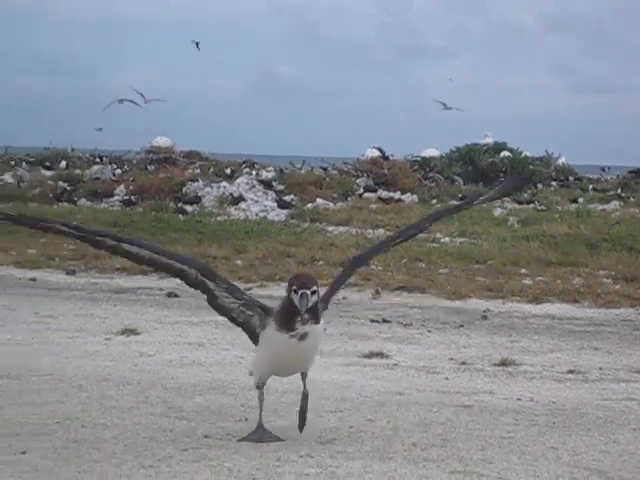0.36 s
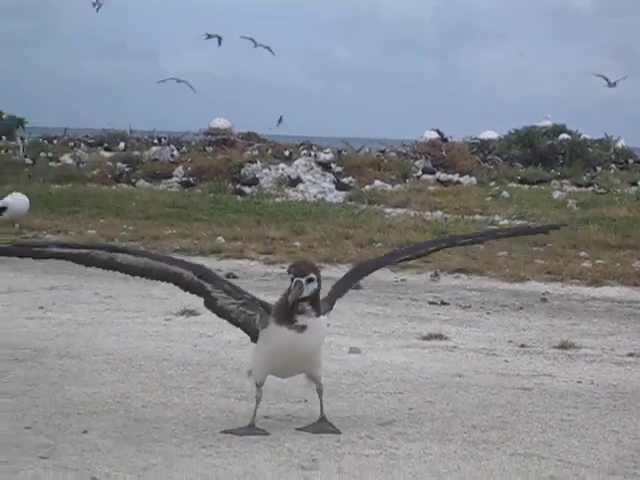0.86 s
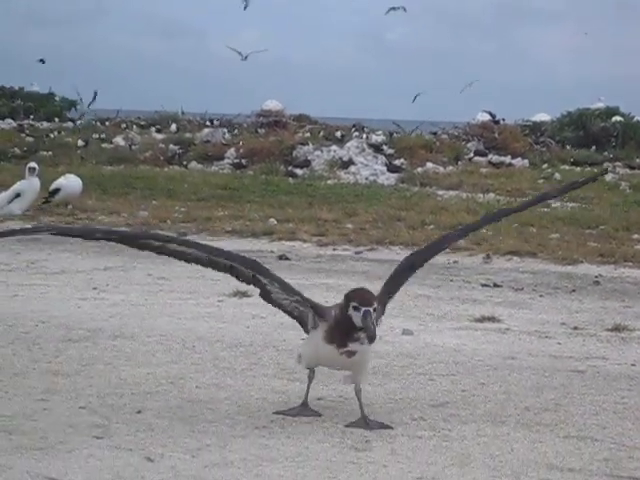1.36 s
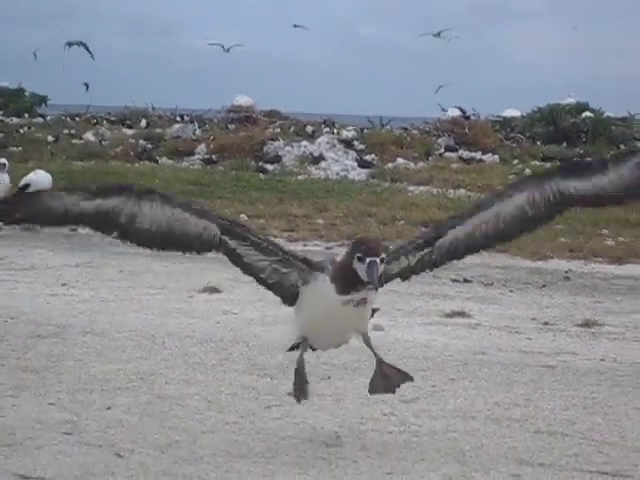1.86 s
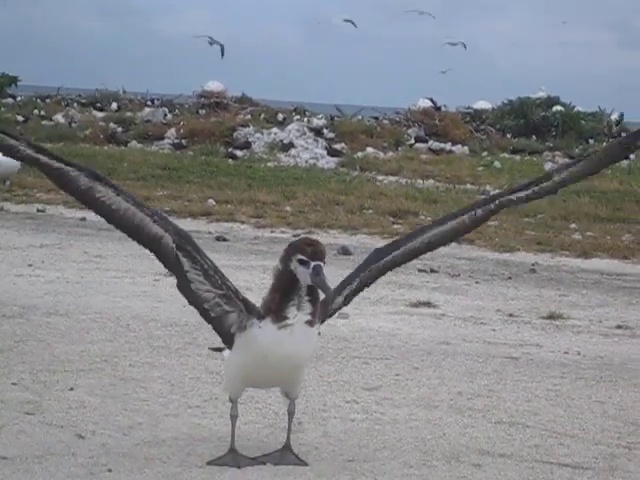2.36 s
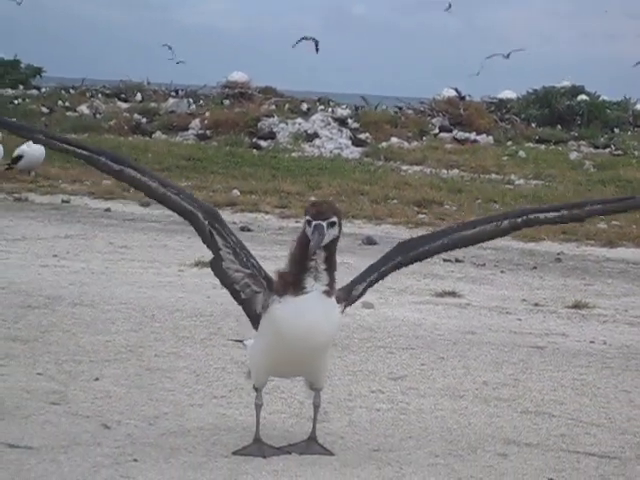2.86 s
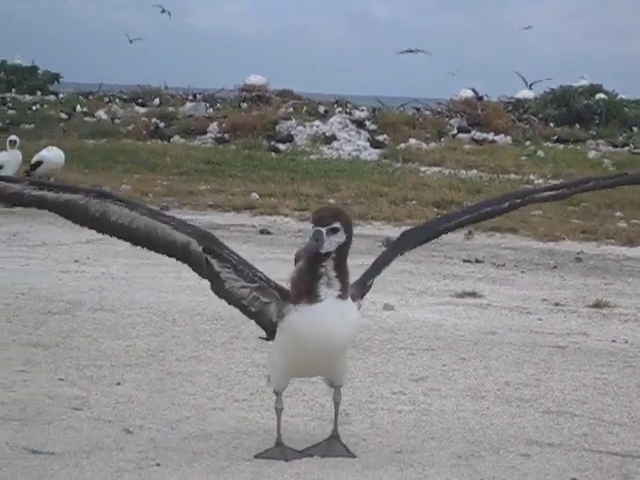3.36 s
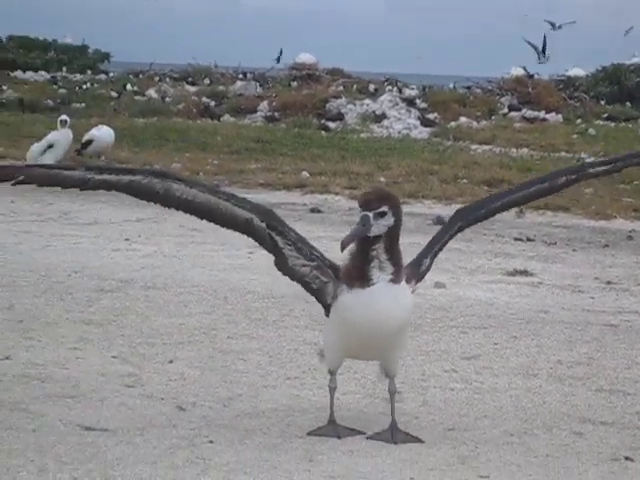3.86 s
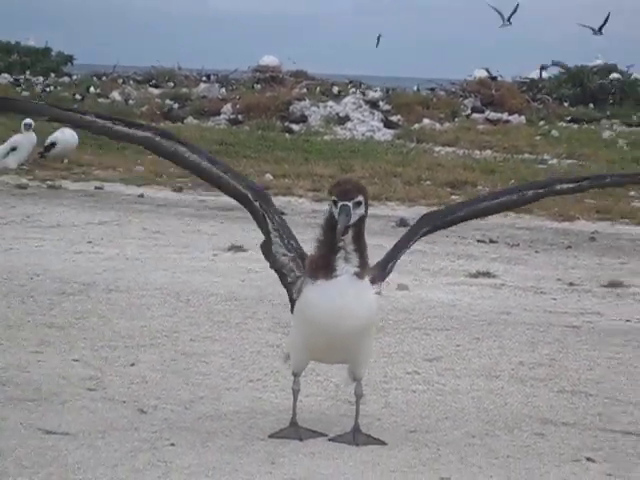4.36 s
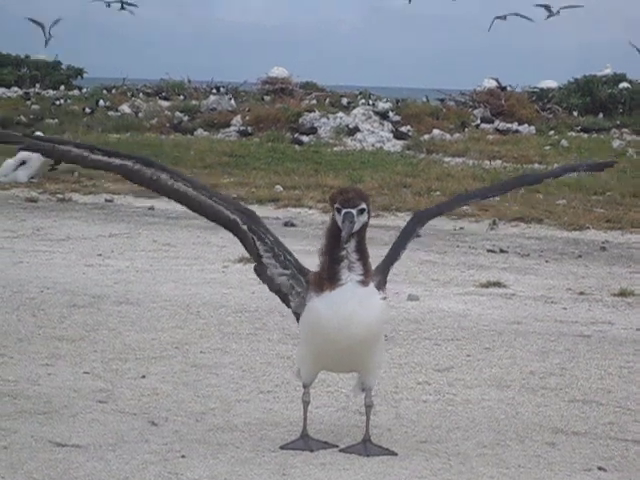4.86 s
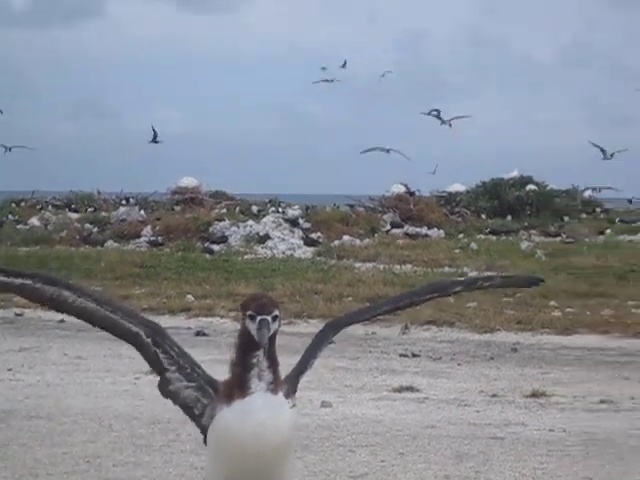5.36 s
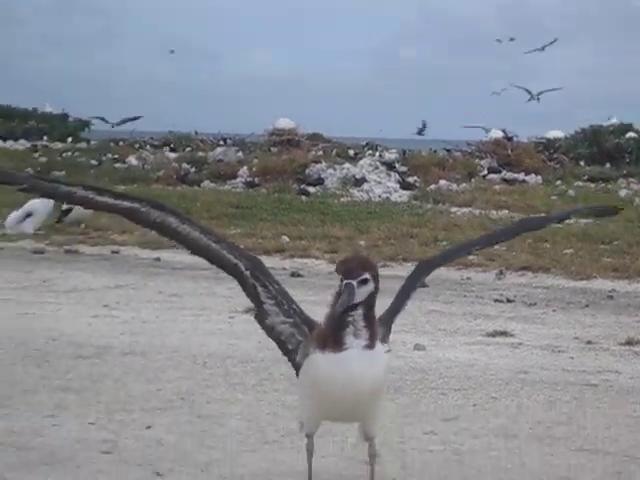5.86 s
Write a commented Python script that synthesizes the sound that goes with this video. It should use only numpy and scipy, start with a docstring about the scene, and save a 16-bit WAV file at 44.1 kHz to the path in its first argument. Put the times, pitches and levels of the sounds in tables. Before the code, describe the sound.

Terns give harsh, nasal, buzzy cries near the microphone over dense seabird colony chatter, while gusty wind thumps and flutters against it.

```python
"""An open seabird colony in gusty wind, heard by one microphone.
Terns fly past with clean, buzzy, gliding calls: pulse trains and breath through a throat and bill filter.
Behind them is the dense chatter of the far colony and of birds overhead: crowds of gliding pulse trains.
The wind is filtered noise, a rumble and a lumpy flutter on the microphone port, bursting into short puffs.
A faint steady hiss of sea and open ground lies beneath."""
import sys
import numpy as np
from scipy import signal
from scipy.fft import rfft, irfft, next_fast_len
from scipy.io import wavfile
from scipy.ndimage import uniform_filter1d, map_coordinates

SR = 44100
rng = np.random.default_rng(int(sys.argv[2]) if len(sys.argv) > 2 else 0)


def dump_mix(stems):
    """Bounce the given channels to the path in sys.argv[1] as a 16-bit WAV at rate SR."""
    frames = np.atleast_2d(stems).T  # one column per channel
    limited = np.clip(frames, -1, 1)  # hard clip at full scale
    pcm = np.round(limited * 32767).astype(np.int16)
    wavfile.write(sys.argv[1], SR, pcm)


def ratio_of_db(decibels):
    """Turn decibels (scalar or array-like) into linear amplitude factors; 0 dB maps to 1."""
    return 10 ** (np.asarray(decibels, float) / 20)


N = 275184  # samples

# Colony levels. Each row: time in seconds, far chatter in dB, birds overhead in dB.
COLONY_LEVELS = [(0.0, -35.5, -41), (0.24, -35, -49), (0.56, -40.5, -54.5), (0.84, -34, -43.5),
                 (1.54, -35, -47), (1.8, -31, -38.5), (2.54, -38.5, -50), (2.88, -32, -47),
                 (3.02, -30, -39), (3.34, -34, -43), (3.56, -34, -45), (3.88, -36.5, -47.5),
                 (4.74, -27, -36.5), (5.08, -30.5, -40.5), (5.24, -32.5, -73), (5.38, -31.5, -46),
                 (5.88, -28.5, -38), (6.22, -36.5, -47)]
# Far chatter spectrum. Each row: frequency in Hz, relative gain in dB.
FAR_SPECTRUM = [(900, -21.5), (1400, -17), (1950, -2), (2750, 1.5), (3500, -9.5), (5000, -40.5),
                (6000, -23), (9000, -35.5), (15800, -50)]
# Overhead birds spectrum. Each row: frequency in Hz, relative gain in dB.
OVERHEAD_SPECTRUM = [(2600, -36), (3600, -4), (4700, 2.5), (5400, -4), (6100, -20), (8000, -48),
                     (11000, -36), (15800, -28)]
# Wind levels. Each row: time in seconds, rumble in dB, flutter over rumble in dB.
WIND_LEVELS = [(0.0, -40, -2), (0.07, -25, 1.5), (0.24, -41.5, -3.5), (0.29, -27, 1.5), (0.52, -29.5, 1),
               (0.54, -37.5, -1), (0.64, -28, -33), (0.76, -38, 1.5), (0.9, -34.5, 0.5), (2.15, -23, -4.5),
               (2.59, -28.5, -4.5), (2.64, -19, -11), (2.76, -33, -9), (3.53, -22.5, -0.5),
               (3.82, -39, -2.5), (4.69, -34.5, -4), (4.97, -31, 3), (6.24, -28, -4)]
# Rumble spectrum. Each row: frequency in Hz, relative gain in dB.
RUMBLE_SPECTRUM = [(15, 4.5), (30, -6), (70, -0.5), (130, -5.5), (250, -26), (600, -75)]
# Flutter spectrum. Each row: frequency in Hz, relative gain in dB.
FLUTTER_SPECTRUM = [(70, -56), (140, 4), (250, -0.5), (450, -13.5), (900, -24.5), (1600, -102)]
# Tern throat resonance. Each row: frequency in Hz, gain in dB.
THROAT_GAIN = [(700, -9), (1500, -26), (2400, 19.5), (3300, 8), (4200, 7), (5200, 7.5), (6800, -1.5),
               (9000, -14), (12000, -20.5), (16000, -37)]
# Full call up to a catch of the voice. Each row: time from the catch in seconds before slowing,
# pitch in Hz before scaling to the top pitch, level in dB relative to the call.
CALL_BEFORE_CATCH = [(-.175, 740, -40), (-.15, 726, 1), (-.13, 840, -8.5), (-.115, 925, 0.5),
                     (-.098, 810, 0.5), (-.062, 760, 2.5), (-.043, 855, -0.5), (-.028, 966, 4),
                     (-.008, 1130, -0.5), (0, 1220, 2)]
# Full call after the catch. Each row: time, pitch and level, as in CALL_BEFORE_CATCH.
CALL_AFTER_CATCH = [(.015, 1010, -12), (0.023, 1050, 6), (0.035, 890, 0.5), (0.05, 960, 1),
                    (0.07, 880, -7.5), (0.079, 848, -1)]
# Full calls. Each row: catch in seconds, slowness as a factor, top pitch in Hz, level in dB,
# open-bill resonance in Hz, its lift in dB.
FULL_CALLS = [(.15, 0.83, 1155, -40.5, 3300, 3), (3.616, 1.001, 1212, -39, 3500, 2),
              (4.545, 0.81, 1145, -41, 2770, 7.5), (5.293, 0.99, 1158, -39.5, 3220, 2)]
# Single notes, each one smooth bend. Each row: start in seconds, length in seconds, first pitch in Hz,
# middle pitch in Hz, last pitch in Hz, level in dB, bill resonance in Hz, its lift in dB.
SINGLE_NOTES = [(0.2, .033, 980, 960, 850, -50, 11700, 23), (.312, 0.042, 755, 802, 790, -49, 8060, 13),
                (0.386, 0.045, 720, 860, 704, -45.5, 8800, 12),
                (0.687, 0.04, 785, 890, 783, -38, 4120, 2.5), (0.779, 0.067, 663, 710, 785, -43.5, 8500, 8),
                (0.831, 0.037, 778, 670, 603, -43, 8340, 13), (0.874, .04, 623, 682, 640, -48, 8500, 19),
                (0.912, 0.037, 736, 786, 706, -46, 9000, 27), (1.145, 0.079, 774, 797, 856, -55, 4930, 16),
                (1.2, 0.052, 800, 613, 716, -51.5, 5160, 12),
                (1.289, 0.065, 697, 750, 968, -42.5, 9000, -4),
                (1.359, 0.046, 912, 811, 777, -43, 11800, 20), (1.414, .047, 780, 795, 746, -50.5, 4200, 9),
                (2.396, 0.049, 860, 980, 820, -48.5, 3780, 9), (2.579, 0.11, 846, 914, 796, -46.5, 7600, 9),
                (2.725, 0.07, 800, 737, 744, -42, 3020, 8), (2.821, 0.076, 790, 932, 875, -53, 7050, 14),
                (2.914, 0.039, 629, 653, 720, -41.5, 4800, 10),
                (2.941, 0.073, 643, 590, 727, -37, 4800, 5.5), (3.012, 0.069, 692, 744, 816, -36, 4500, 2),
                (3.065, 0.035, 800, 844, 797, -35, 4230, 6), (3.136, 0.091, 587, 521, 677, -39.5, 4500, -1),
                (3.198, 0.045, 683, 680, 656, -39.5, 4500, -3),
                (3.714, 0.092, 548, 451, 587, -39, 7000, 5.5), (3.799, 0.031, 577, 673, 773, -32, 7000, -1),
                (3.859, 0.074, 530, 520, 497, -45.5, 7000, -1), (3.934, 0.037, 549, 578, 580, -38, 4530, 4),
                (3.965, .057, 576, 527, 587, -37.5, 4500, 4), (4.027, 0.13, 689, 701, 1013, -39, 7500, 4.5),
                (4.159, 0.057, 808, 693, 826, -39, 6900, 7), (4.217, 0.046, 793, 860, 766, -41, 6000, 2),
                (5.802, 0.038, 580, 600, 630, -47, 5000, -4), (5.969, .04, 690, 650, 663, -47, 6000, 3),
                (4.255, 0.067, 660, 685, 883, -35.5, 6500, 3), (4.308, 0.033, 885, 696, 673, -41, 6500, 6),
                (4.352, 0.073, 822, 930, 846, -48, 9700, 14), (4.438, 0.039, 676, 760, 740, -41, 11500, 21),
                (4.588, 0.032, 632, 670, 800, -34, 6000, 0), (4.537, .055, 620, 583, 638, -41, 6500, 3),
                (4.466, 0.063, 563, 520, 640, -41, 5000, 7), (4.686, .045, 604, 560, 600, -42, 5500, 5),
                (4.741, 0.053, 760, 820, 713, -33, 5500, 4), (4.856, .06, 602, 650, 585, -43, 6000, 0),
                (3.996, 0.034, 700, 822, 750, -48, 12500, 10), (4.91, 0.033, 639, 672, 620, -36, 7000, 3),
                (5.335, 0.043, 881, 940, 860, -59, 13050, 20), (4.642, 0.041, 717, 664, 650, -38, 5660, 7),
                (4.714, 0.089, 500.5, 602, 692, -34, 5440, 3.5),
                (4.814, 0.021, 627, 609, 543, -30.5, 2200, 6), (5.602, 0.07, 629, 677, 690, -36, 4800, 0),
                (5.674, 0.072, 702, 799, 886, -32.5, 4700, 4.5),
                (5.757, 0.03, 772, 647, 635, -33.5, 5500, 7), (5.843, 0.097, 639, 807, 886, -30, 3000, -1),
                (5.937, 0.027, 856, 795, 777, -33.5, 3020, 2), (6.002, .07, 661, 725, 890, -38, 4400, -1),
                (6.072, 0.058, 863, 800, 860, -46, 4400, 5.5)]
# Wind puffs. Each row: centre in seconds, level in dB, swing pitch in Hz.
PUFF_EVENTS = [(0.074, -17, 230), (0.297, -12, 300), (0.311, -11, 520), (0.363, -18.5, 302),
               (0.43, -15, 353), (0.49, -18, 286), (0.526, -20, 340), (1.192, -19, 368),
               (1.312, -11.5, 280), (1.331, -12.5, 303), (1.474, -7.5, 388), (1.49, -1.5, 445),
               (1.527, -12, 424), (1.542, -14, 596), (1.578, -17.5, 480), (1.679, -12.5, 342),
               (1.825, -11, 372), (2.091, -12, 340), (2.172, -7, 373), (2.234, -16.5, 406),
               (2.267, -10.5, 303), (2.3, -13, 332), (2.37, -4.5, 374), (2.384, -10.5, 460),
               (2.646, -10.5, 393), (2.661, -9.5, 380), (3.039, -16, 340), (3.141, -7, 460),
               (3.175, -13.5, 354), (3.223, -19, 354), (3.272, -12, 286), (3.366, -9, 320),
               (3.544, -13, 320), (3.578, -3.5, 598), (3.605, -13.5, 366), (3.716, -12.5, 416),
               (3.883, -22, 280), (4.852, -16.5, 272), (4.97, -14.5, 297), (5.056, -9, 312.7),
               (5.248, -12.5, 318), (5.54, -6, 368), (5.551, -8.5, 390), (5.567, -8, 466),
               (5.582, -14, 590), (5.694, -15.5, 477), (5.719, -12, 410), (5.893, -17, 330),
               (6.147, -13, 374)]

NOTE_ONSET_DROP_DB, NOTE_END_DROP_DB = 6, -1  # under the middle; negative is above it
DULL_DB_PER_KHZ, DULL_DB_PER_KHZ_PER_LIFT_DB = -0.7, 0.11  # treble loss, growing with bill lift
STRETCHED_LOSS_DB_PER_KHZ = 1.4  # extra loss of a stretched throat above 9 kHz
BREATH_RATIO_FULL, BREATH_RATIO_NOTE = 0.2, 0.25  # noise rms over pulse rms
THROAT_STRETCH_FULL = 1.17  # frequency factor
QUAVER_RATIO = 0.012  # pitch waver
ECHO_GAIN, ECHO_DRIFT_PER_S = 0.6, 5  # ground echo; scale of its random lag drift
NEARBY_SPREAD_S, NEARBY_DB, NEARBY_HZ = 0.04, -12.5, 340  # second puff: time spread, mean relative level, median pitch
BAND_LIMIT_HZ = 15750


def unit(x):
    """Scale to rms 1."""
    return x / np.sqrt(np.mean(x ** 2) + 1e-20)


def along(points, hz):
    """Gain in dB from (Hz, dB) points on a log frequency axis, -90 dB outside."""
    point_hz, point_db = np.transpose(points)
    return np.interp(np.log(hz + 1), np.log(point_hz + 1), point_db, left=-90, right=-90)


def curves(rows):
    """One value per sample for each column after the time."""
    time_s, *columns = np.transpose(rows)
    return [np.interp(np.arange(N) / SR, time_s, column) for column in columns]


def wobble(rate_hz):
    """Smooth random curve with rate_hz knots a second."""
    grid = np.arange(0, N + 32, 32)
    coarse = map_coordinates(rng.standard_normal(N // 200), [grid * rate_hz / SR])
    return np.interp(np.arange(N), grid, coarse)


def coloured(x, db_of_hz):
    """Filter x by a gain in dB over frequency."""
    size = next_fast_len(len(x) + 4096)
    gain = ratio_of_db(db_of_hz(np.fft.rfftfreq(size, 1 / SR)))
    return irfft(rfft(x, size) * gain, size)[:len(x)]


def syrinx(hz):
    """Voice source: one sharp pulse a cycle, all overtones equally strong, rms 1."""
    overtones = int(20000 / hz.max())
    half_phase = np.pi * (np.cumsum(hz) / SR % 1) + 1e-7  # offset avoids 0/0
    pulses = np.sin((2 * overtones + 1) * half_phase) / np.sin(half_phase) - 1
    return pulses / np.sqrt(2 * overtones)


def flock(count, pitch_hz, glide, quiet, blur_db):
    """Birds that call on and off in short gliding syllables; the farthest blur into a hiss."""
    crowd = np.zeros(N)
    for _ in range(count):
        hz = pitch_hz * np.exp(glide * np.tanh(wobble(14)) + 0.087 * wobble(36))
        calling = np.clip(10.6 * (wobble(18) - quiet), 0, 1)
        crowd += syrinx(hz) * calling * ratio_of_db(3.1 * wobble(4.6))
    return unit(crowd) + ratio_of_db(blur_db) * rng.standard_normal(N)


def colony():
    """The far ground colony is dense and dull; the birds overhead keep more treble."""
    far_db, overhead_db = curves(COLONY_LEVELS)
    far = flock(count=13, pitch_hz=760, glide=0.2, quiet=0.3, blur_db=-8)
    overhead = flock(count=12, pitch_hz=740, glide=0.2, quiet=0.4, blur_db=-12)
    far = unit(coloured(far, lambda f: along(FAR_SPECTRUM, f)))
    overhead = unit(coloured(overhead, lambda f: along(OVERHEAD_SPECTRUM, f)))
    return ratio_of_db(far_db) * far + ratio_of_db(overhead_db) * overhead


def wind():
    """Pressure swings on the port: a deep rumble, and a lumpy flutter that follows the gusts."""
    rumble_db, flutter_over_rumble_db = curves(WIND_LEVELS)
    swell = wobble(12)
    rumble = rng.standard_normal(N) * ratio_of_db(1.27 * swell)
    rumble = unit(coloured(rumble, lambda f: along(RUMBLE_SPECTRUM, f)))
    lumps = ratio_of_db(4.04 * swell + 7.76 * wobble(70))
    flutter = rng.standard_normal(N) * lumps
    flutter = unit(coloured(flutter, lambda f: along(FLUTTER_SPECTRUM, f)))
    return ratio_of_db(rumble_db) * (rumble + ratio_of_db(flutter_over_rumble_db) * flutter)


def air():
    """Faint steady hiss of sea and open ground: noise that falls off above 900 Hz."""
    hiss = coloured(rng.standard_normal(N), lambda f: -18 * np.log10(1 + (f / 900) ** 2))
    return ratio_of_db(-48.5) * unit(hiss)


def syllables():
    """Each near syllable: time, pitch and level curves, breath ratio, throat stretch, bill resonance."""
    for catch_s, slowness, top_hz, db, *bill in FULL_CALLS:
        for part in (CALL_BEFORE_CATCH, CALL_AFTER_CATCH):
            s, hz, relative_db = np.transpose(part)
            pitch_hz = hz * top_hz / CALL_BEFORE_CATCH[-1][1]
            level_db = db + relative_db
            yield catch_s + slowness * s, pitch_hz, level_db, BREATH_RATIO_FULL, THROAT_STRETCH_FULL, bill
    u = np.linspace(-1, 1, num=9)  # note position, start to end
    for start_s, length_s, first_hz, middle_hz, last_hz, db, *bill in SINGLE_NOTES:
        slope, bow = (last_hz - first_hz) / 2, (first_hz + last_hz) / 2 - middle_hz
        pitch_hz = middle_hz + u * slope + u ** 2 * bow
        level_db = db - u ** 2 * np.where(u < 0, NOTE_ONSET_DROP_DB, NOTE_END_DROP_DB)
        yield start_s + length_s * (u + 1) / 2, pitch_hz, level_db, BREATH_RATIO_NOTE, 1, bill


def terns(jitter=0.002, effort=0.45):
    """Near calls: pulses and breath with a ground echo, through throat and bill; louder is brighter."""
    out = np.zeros(N + SR)
    shake = wobble(150) * jitter + wobble(40) * QUAVER_RATIO
    breath = rng.standard_normal(N)
    for s, hz, db, breath_ratio, stretch, (bill_hz, bill_db) in syllables():
        i = np.arange(round(s[0] * SR), round(s[-1] * SR))
        t = i / SR
        pitch_hz = uniform_filter1d(np.interp(t, s, hz), size=260)
        level_db = np.interp(t, s, db)
        voice = syrinx(pitch_hz * (1 + shake[i])) + breath_ratio * breath[i]

        # The echo lag drifts as the bird flies.
        mid_lag_s = rng.uniform(0.00026, 0.000601)
        drift = np.exp(ECHO_DRIFT_PER_S * rng.standard_normal() * (t - t.mean()))
        late = mid_lag_s * SR * drift
        voice = voice + ECHO_GAIN * map_coordinates(voice, [np.arange(len(t)) - late])

        dull = DULL_DB_PER_KHZ + DULL_DB_PER_KHZ_PER_LIFT_DB * bill_db

        def tract_db(f):
            throat = along(THROAT_GAIN, f / stretch) - dull * (f - 4500) / 1000
            bill = bill_db * np.exp(-(np.log((f + 1) / bill_hz) / 0.2) ** 2)
            loss = (stretch > 1) * STRETCHED_LOSS_DB_PER_KHZ * np.maximum(f - 9000, 0) / 1000
            return throat + bill - loss

        voice = coloured(voice, tract_db)
        treble = coloured(voice, lambda f: -10 * np.log10(1 + (6500 / (f + 1)) ** 4))
        voice += treble * (ratio_of_db(effort * (level_db - db.max())) - 1)
        fade = np.clip(np.minimum((t - s[0]) / 0.0025, (s[-1] - t) / 0.003), 0, 1)
        out[i] += voice * fade * ratio_of_db(level_db)
    return out[:N]


def eddies():
    """The listed puffs, and a second puff, on average weaker, shortly before or after each listed one."""
    s, db, _ = np.transpose(PUFF_EVENTS)
    r = rng.standard_normal((len(PUFF_EVENTS), 3))
    nearby_s = np.abs(s + NEARBY_SPREAD_S * r[:, 0])
    nearby_db = db + NEARBY_DB + 3 * r[:, 1]
    nearby_hz = NEARBY_HZ * np.exp(0.053 * r[:, 2])
    return PUFF_EVENTS + list(zip(nearby_s, nearby_db, nearby_hz))


def puffs(decay_cycles=0.57, ragged=0.57, sharpen=0.14):
    """An eddy bursts on the port: one or two quick swings with a ragged skirt, brighter when strong."""
    half = SR // 20
    out = np.zeros(N + SR)
    t = np.arange(-half, half) / SR
    for s, db, hz in eddies():
        swing = np.cos(2 * np.pi * (hz * t + rng.random()))
        swing *= np.exp(-np.abs(t * hz / decay_cycles) * np.where(t < 0, 2, 1))
        # slower body of the eddy
        push = 0.5 * np.cos(2 * np.pi * (0.38 * hz * t + rng.random())) * np.exp(-(t * hz / 1.18) ** 2)
        corner_hz = 1.105 * hz * ratio_of_db(sharpen * (db + 15.5))
        skirt = coloured(rng.standard_normal(2 * half), lambda f: -30 * np.log10(1 + (f / corner_hz) ** 2))
        skirt = unit(skirt) * np.exp(-np.abs(t * hz) / np.where(t < 0, 1.1, 1.9))
        out[round(s * SR):][:2 * half] += ratio_of_db(db) * (swing + push + ragged * skirt)
    return out[half:][:N]


def scene():
    """One microphone feeds both channels."""
    mono = terns() + colony() + wind() + puffs() + air()
    return np.array([mono, mono])


def top_cut(x):
    """Nothing passes above the cut-off."""
    return signal.sosfilt(signal.butter(12, 15710, fs=SR, output="sos"), x)


def record(dry):
    """The strongest puffs flatten in the input stage; a filter takes 120 dB off above the band limit."""
    flattened = dry / (1 + np.abs(dry / 0.74) ** 6) ** (1 / 6)
    mix = np.array([coloured(channel, lambda f: -120 * (f > BAND_LIMIT_HZ)) for channel in flattened])
    return top_cut(mix)


dry = scene()
out = record(dry)
dump_mix(out)
```